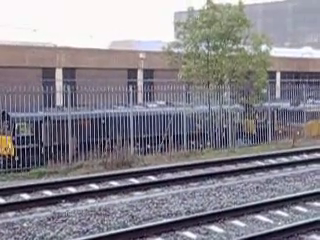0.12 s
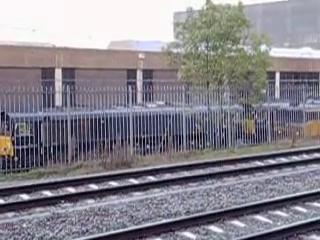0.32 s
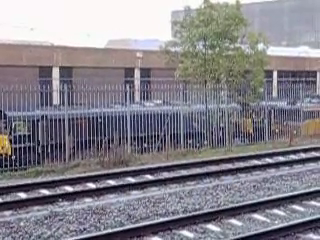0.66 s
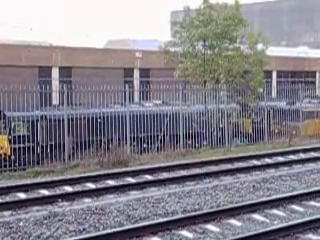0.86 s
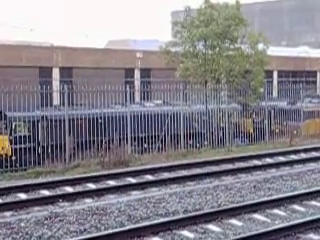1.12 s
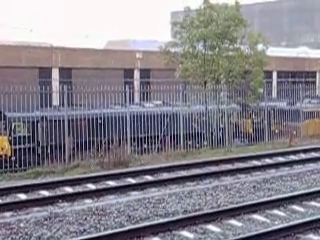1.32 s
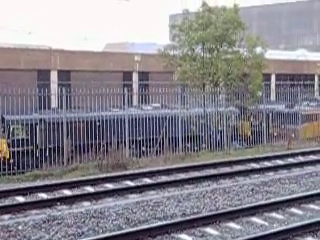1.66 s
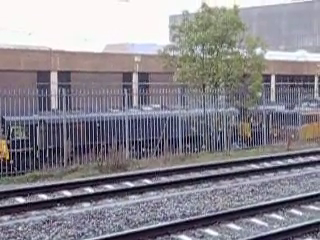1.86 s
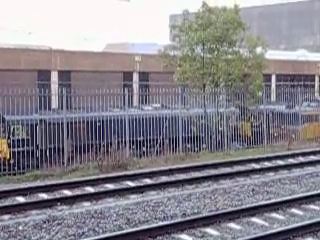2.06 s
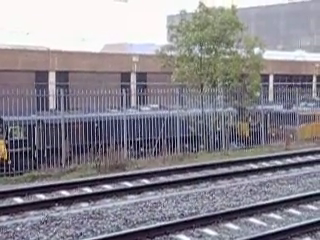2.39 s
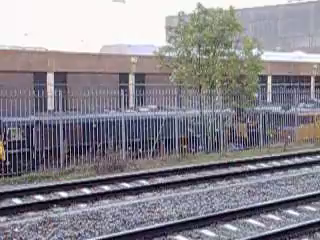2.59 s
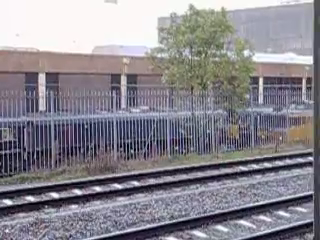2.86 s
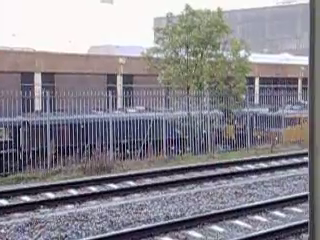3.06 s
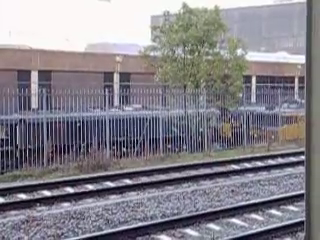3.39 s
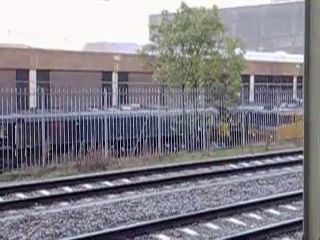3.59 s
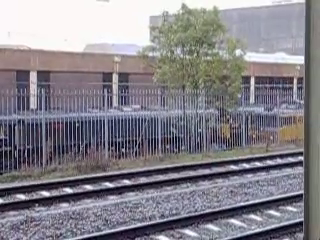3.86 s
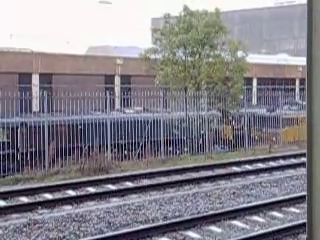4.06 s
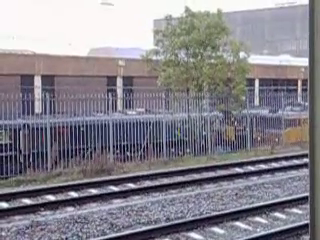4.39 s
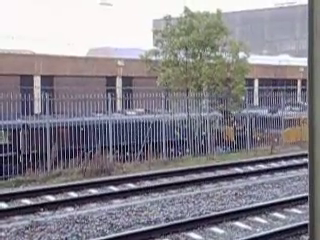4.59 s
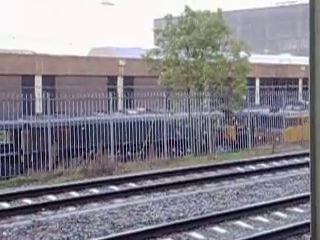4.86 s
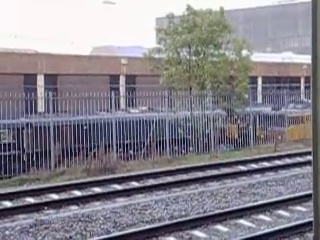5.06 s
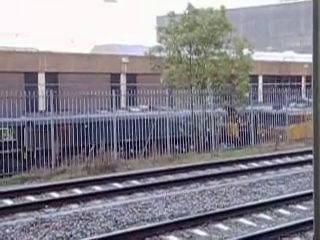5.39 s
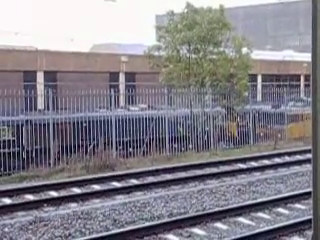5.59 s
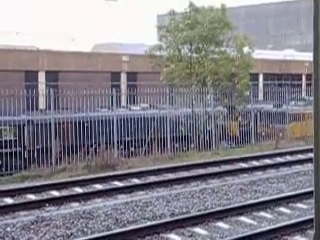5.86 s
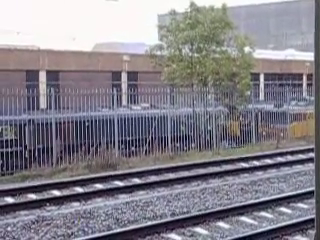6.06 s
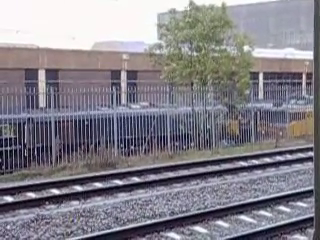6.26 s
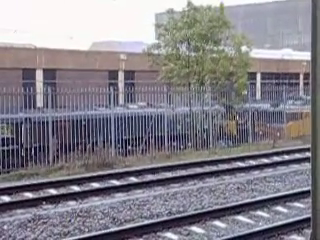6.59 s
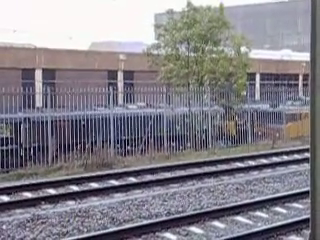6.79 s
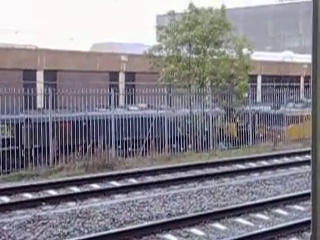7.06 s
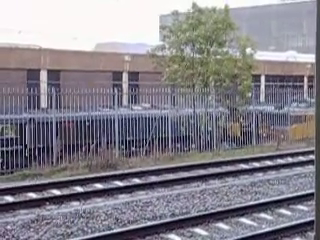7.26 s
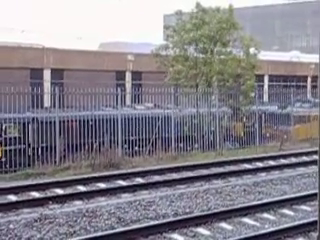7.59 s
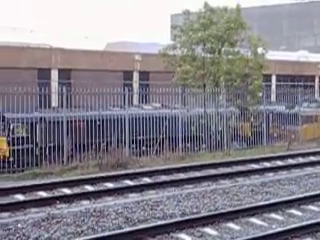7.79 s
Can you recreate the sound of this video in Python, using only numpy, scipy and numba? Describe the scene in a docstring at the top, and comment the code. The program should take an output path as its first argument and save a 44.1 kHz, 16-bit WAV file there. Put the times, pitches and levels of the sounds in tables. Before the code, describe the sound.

Outdoors beside railway tracks, a heavy diesel engine turns over steadily: thumping exhaust, metallic rattle and a hard knock nearly six times a second, over humming panels, wavering gear whine and airy whistle. Gusts buffet the cheap, muffled, crackly microphone in the first half. A violent thump of air around four seconds ducks the level sharply and strips the bass; the rumble gradually returns and idles on to the end.

```python
"""A twelve-cylinder two-stroke diesel locomotive idles in a depot, heard across the tracks.
From the start each crank turn repeats lumpy exhaust beats, one hard knock and a looped clatter, with droning
panels, wavering gear tones and a throbbing whistle over fan noise; gusts of shaped noise come and go.
Just after four seconds one hard slap of air makes the gain control duck everything, thinning the bass most.
The engine then swells back over about two seconds and idles on to the end."""
import sys
import numpy as np
from scipy import signal
from scipy.fft import rfft, irfft, next_fast_len
from scipy.io import wavfile
from scipy.ndimage import uniform_filter1d, map_coordinates
from numba import njit

SR = 44100
rng = np.random.default_rng(int(sys.argv[2]) if len(sys.argv) > 2 else 0)


def to_wav(s):
    """Save 16-bit WAV."""
    ch = np.atleast_2d(s).T  # columns
    pcm = np.round(np.clip(ch, -1, 1) * 32767)  # PCM
    wavfile.write(sys.argv[1], SR, pcm.astype(np.int16))


N = 349713
T = np.arange(N) / SR

# Length of a crank turn and start of the reference turn, in seconds
TURN_S, FIRST_TURN_S = .174578, .1073
# Upper limit of the output band
TOP_HZ = 15800

# Wind rumble on the microphone, low and bright parts. Each row: frequency in Hz, relative level in dB.
WIND_LOW = [(20, -7), (42, 1), (85, 1), (135, -2), (250, -16), (500, -31)]
WIND_BRIGHT = [(80, -9.5), (150, -0.5), (270, -1.5), (420, -13.5), (900, -32)]
# A light breeze that slowly drops: relative level, and its fall
BREEZE_DB, BREEZE_DROP_DB_PER_S = -22.5, 1.0
# Gusts over the breeze. Each row: start in seconds, hold in seconds, relative level in dB.
GUST_ROWS = [(.58, .9, -17), (1.66, .12, -18.5), (2.14, .42, -11.5), (2.8, .2, -13), (3.56, .6, -18),
             (4.3, .13, -12), (4.72, .12, -18.5)]
# Every gust rises and dies away alike
GUST_ATTACK_S, GUST_RELEASE_S = .06, .12
# Hardest slaps of air. Each row: centre in seconds, peak in dB re full scale ahead of the gain control,
# half-length of the push in seconds.
AIR_SLAPS = [(.575, -5, .0013), (.606, -.5, .0013), (.615, 1, .0012), (1.21, -5, .001),
             (1.336, -3.5, .0021), (2.135, -3, .0014), (2.171, -3.5, .0017), (2.263, .5, .001),
             (2.283, .5, .0016), (2.362, 1.5, .0017), (2.412, -2, .002), (2.558, 4.5, .0015),
             (2.906, -2.5, .0021), (3.085, 0, .0022), (3.549, -4.5, .0018), (3.911, -3.5, .0011),
             (4.1715, 25.5, .0017)]
# Spectrum of the fan and intake air. Each row: frequency in Hz, relative level in dB.
FAN_SPECTRUM = [(25, -2.5), (60, 3), (120, -1), (330, -2.5), (700, -1.5), (1000, -5.5), (1300, -2),
                (1600, -9), (2080, -4), (2330, -12), (2660, -7.5), (2850, -11.5), (3700, -15.5),
                (4400, -16)]
# Free-running tones of gears and auxiliaries. Each row: pitch in Hz, level in dB before fading,
# spread of the pitch waver in Hz.
GEAR_TONES = [(472, -42.5, 3.05), (668.5, -29.5, 5.04), (893, -40.5, 3), (1170, -40, 3), (1350, -42.5, 2),
              (1804, -41.5, 1.5), (1946, -47.5, 2), (2266, -42.5, 1), (2680, -51.5, 3.9),
              (3353, -49.5, 3.3)]
# The whistle: level before drifting, slow sag, and spread of its fading in the moving air
WHISTLE_DB, WHISTLE_SAG_DB_PER_S, WHISTLE_FADE_DB = -29.2, .38, 1.0
# Hood panels droning with the crank. Each row: pitch in Hz before locking to the crank, level in dB
# before fading, throb depth from 0 to 1, share of the turn at which it swells.
PANEL_DRONES = [(229, -35.5, 0.3, .3), (275, -41.5, 0.7, .3), (360.4, -35, .35, 0.57),
                (413.2, -39, 0.3, 0.62), (449.1, -30.5, .8, 0.59), (469.8, -37.5, 0.6, .4),
                (498.5, -36.5, 0.3, 0.69), (550, -36, 0.8, 0.0057), (605.7, -42, .6, 0.48),
                (680, -24.5, .9, 0.61), (733, -33.5, 1, 0.0085)]
# Spectrum of the mechanical rattle. Each row: frequency in Hz, relative level in dB.
CLATTER_SPECTRUM = [(90, -36), (140, -15), (225, -7), (310, -10), (400, -1), (530, 1), (630, -4), (700, -2),
                    (790, 1.5), (870, -7.5), (1300, -16.5), (1550, -18), (2100, -12.5), (3300, -31.5)]
# Exhaust beats of one crank turn. Each row: seconds into the turn, relative thump level in dB,
# relative stack ring level in dB, ring pitch in Hz.
EXHAUST_BEATS = [(.011, 0, 1.2, 687), (.0275, -5, -9.5, 690), (.039, -4, -9, 730), (.0535, -14.5, -7, 660),
                 (.0685, -8.5, -13, 780), (.0885, -0.5, -6, 726), (.1062, -2, -7.5, 700),
                 (.116, -13.5, -5, 675), (.1295, -3, -9.5, 710), (.141, -17.5, -14.5, 692),
                 (.157, -12, -6, 705), (.165, -5, -10.5, 735)]
# Spectrum of an exhaust thump. Each row: frequency in Hz, relative level in dB.
THUMP_SPECTRUM = [(15, -28.5), (32, -6.5), (50, 3), (85, 2), (110, -12), (160, -19.5), (230, -13),
                  (320, -26), (600, -48.5)]


def undb(db):
    """Decibels to gain."""
    return 10 ** (np.asarray(db) / 20)


def level(x, db):
    """Scale to an rms level in dB."""
    return x * undb(db) / np.sqrt(np.mean(x ** 2))


def shape(x, gain):
    """Filter by a gain given as a function of frequency."""
    size = next_fast_len(N + SR // 4)
    hz = np.maximum(np.fft.rfftfreq(size, 1 / SR), 1)
    return irfft(rfft(x, size) * gain(hz), size)[:N]


def colour(x, points):
    """Filter by (Hz, dB) points, falling away steeply beyond both ends."""
    hz, db = np.transpose(points)

    def gain(f):
        ends = np.minimum(1, np.minimum(f / hz[0], hz[-1] / f)) ** 2
        return undb(np.interp(np.log(f), np.log(hz), db)) * ends

    return shape(x, gain)


def resonant_noise(hz, width_hz):
    """Noise of unit rms in one resonance."""
    resonance = lambda f: 1 / (1 + 1j * (f / hz - hz / f) * hz / width_hz)
    return level(shape(rng.standard_normal(N), resonance), 0)


def walk(rate):
    """Smooth random wander of unit rms, with about `rate` new values a second."""
    k = int(SR / rate)
    steps = np.repeat(rng.standard_normal(N // k + 2), k)
    return level(uniform_filter1d(steps, k)[rng.integers(k):][:N], 0)


def tone(hz):
    """A sine of unit rms on a moving pitch."""
    return np.sqrt(2) * np.sin(2 * np.pi * (np.cumsum(hz) / SR + rng.random()))


def wind_strength():
    """Strength of the wind in dB: the powers of the breeze and of gusts that rise, hold and die away."""
    power = undb(BREEZE_DB - BREEZE_DROP_DB_PER_S * T) ** 2
    for start, hold, db in GUST_ROWS:
        rise = np.maximum(start - T, 0) / GUST_ATTACK_S
        decay = np.maximum(T - start - hold, 0) / GUST_RELEASE_S
        power = power + (undb(db) * np.exp(-rise - decay)) ** 2
    return 10 * np.log10(power)


def wind(low_db=-2.5, bright_db=-20.0, bright_growth=1.7, gale_db=-10, gusty_db=3.0):
    """Eddies rumble on the microphone; the brighter part grows faster than the wind itself."""
    strength = wind_strength() + gusty_db * walk(18)
    low = level(colour(rng.standard_normal(N), WIND_LOW), low_db)
    bright = level(colour(rng.standard_normal(N), WIND_BRIGHT), bright_db)
    return low * undb(strength) + bright * undb(bright_growth * (strength - gale_db))


def buffets():
    """Single slaps of air: a short push on the diaphragm between two lighter pulls."""
    out = np.zeros(N)
    for s, db, length in AIR_SLAPS:
        near = np.abs(T - s) < .025
        u = ((T[near] - s) / length) ** 2
        out[near] += undb(db) * (1 - u) * np.exp(-u / 2)
    return out


def fans(turns, db=-22.0, pulsing=0.086):
    """Rushing cooling and intake air, noise pulsing lightly at the firing rate."""
    firing = np.cos(2 * np.pi * len(EXHAUST_BEATS) * turns)
    air = colour(rng.standard_normal(N), FAN_SPECTRUM)
    return level(air * (1 + pulsing * firing), db)


def gears(fade_db=2.5):
    """Thin tones that waver in pitch and fade in the moving air."""
    out = np.zeros(N)
    for hz, db, waver in GEAR_TONES:
        out += undb(db + fade_db * walk(4)) * tone(hz + waver * walk(12))
    return out


def whistle(turns, hz=3056, width_hz=36, airy_db=-1.0, throb_db=3.5, throb_turn=.75):
    """The turbocharger's whistle, a wavering tone with resonant air, swells once a turn."""
    throb = np.cos(2 * np.pi * (turns - throb_turn + 0.031 * walk(2)))
    voice = tone(hz + 9 * walk(45)) + undb(airy_db) * resonant_noise(hz, width_hz)
    drift_db = WHISTLE_FADE_DB * walk(3) - WHISTLE_SAG_DB_PER_S * T
    return level(voice * undb(throb_db * throb), WHISTLE_DB) * undb(drift_db)


def hood(turns, fade_db=1.75):
    """Panels hum on whole multiples of the crank rate, each swelling at its own moment of the turn."""
    out = np.zeros(N)
    for hz, db, depth, swell in PANEL_DRONES:
        throb = 1 + depth * np.cos(2 * np.pi * (turns - swell))
        locked_hz = np.full(N, np.round(hz * TURN_S) / TURN_S)
        out += level(throb * tone(locked_hz), db) * undb(fade_db * walk(3))
    return out


def clatter(turns, db=-23, slip_s=.00004):
    """Valve gear and injectors make one dense rattle, repeated on every turn with a little slip."""
    size = int(TURN_S * SR)
    # a flat spectrum of random phases spreads the rattle over the whole turn
    one_turn = irfft(np.exp(2j * np.pi * rng.random(size // 2 + 1)), size)
    place = (turns + slip_s / TURN_S * walk(5)) % 1 * size
    rattle = map_coordinates(one_turn, [place], order=1, mode="grid-wrap")
    return level(colour(rattle, CLATTER_SPECTRUM), db)


def exhaust(thump_db=-18.5, ring_db=-22.0, ring_s=0.0035, ring_lag_s=0.00139, scatter_db=0.36):
    """Each cylinder sends out a low thump and a short ring of the stack; one of them knocks hard."""
    turn_starts = FIRST_TURN_S + TURN_S * np.arange(-1, N / SR / TURN_S)
    t = np.arange(-(SR // 80), SR // 80 + 1) / SR - ring_lag_s
    thumps, rings = np.zeros(N), np.zeros(N)
    for offset, thump, ring, hz in EXHAUST_BEATS:
        at = np.round((turn_starts + offset) * SR).astype(int)
        size = undb(scatter_db * rng.standard_normal(len(at)))
        inside = (at >= 0) & (at < N)
        beats = np.bincount(at[inside], size[inside], N)
        burst = np.exp(-(t / ring_s) ** 2) * np.cos(2 * np.pi * hz * t)
        thumps += undb(thump) * beats
        rings += undb(ring) * signal.oaconvolve(beats, burst, "same")
    return level(colour(thumps, THUMP_SPECTRUM), thump_db) + level(rings, ring_db)


def scene():
    """The wind and the locomotive at one microphone."""
    turns = (T - FIRST_TURN_S) / TURN_S
    engine = fans(turns) + gears() + whistle(turns) + hood(turns) + clatter(turns) + exhaust()
    return (wind() + buffets() + engine)[None]


@njit
def gain_control(x, ceiling, hold_s, recover_db_per_s, recover_share_per_s):
    """Gain in time: a peak over the ceiling cuts it at once; it holds, then creeps back, faster from a deep cut."""
    gain, cut_db, wait = np.empty(len(x)), 0., 0.
    for i in range(len(x)):
        over_db = 20 * np.log10(abs(x[i]) / ceiling + 1e-9)
        if over_db > cut_db:
            cut_db, wait = over_db, hold_s
        gain[i] = 10 ** (-cut_db / 20)
        wait -= 1 / SR
        if wait < 0:
            cut_db = max(0., cut_db - (recover_db_per_s + recover_share_per_s * cut_db) / SR)
    return gain


def record(dry, band_hz=3880, ceiling=1.137, hold_s=0.14, recover_db_per_s=9.0, recover_share_per_s=0.46,
           bass_hz=150, bass_duck=0.41, bias=-0.24, rail=0.86, knee=24, kink=0.643, kink_share=0.5):
    """A small microphone input: narrow band, gain control, and an off-centre stage that crackles on the troughs."""
    narrow = shape(dry[0], lambda f: 1 / np.sqrt(1 + (f / band_hz) ** 44))
    gain = gain_control(narrow, float(ceiling), float(hold_s), float(recover_db_per_s),
                        float(recover_share_per_s))
    # the bass ducks further than the rest, so a deep cut also thins the sound
    bass = shape(narrow, lambda f: 1 / (1 + (f / bass_hz) ** 2))
    ducked = gain * (narrow - bass * (1 - gain ** bass_duck))
    biased = ducked + bias
    # deep troughs meet a kink before the rail, which makes a fine crackle
    kinked = biased + kink_share * np.maximum(0, -kink - biased)
    clipped = kinked / (1 + np.abs(kinked / rail) ** knee) ** (1 / knee)
    lowpass = signal.ellip(8, .1, 60, TOP_HZ, fs=SR, output="sos")
    return signal.sosfiltfilt(lowpass, clipped)[None]


dry = scene()
out = record(dry)
to_wav(out)
```